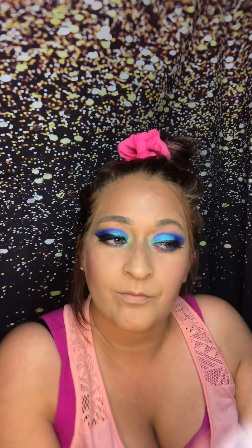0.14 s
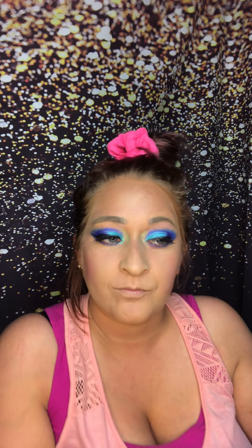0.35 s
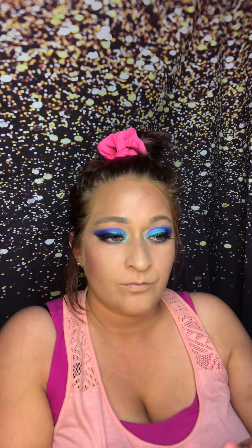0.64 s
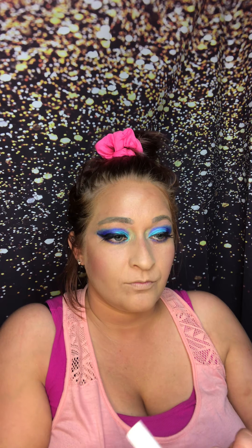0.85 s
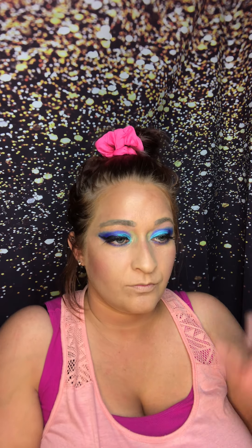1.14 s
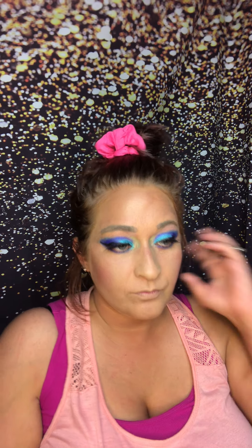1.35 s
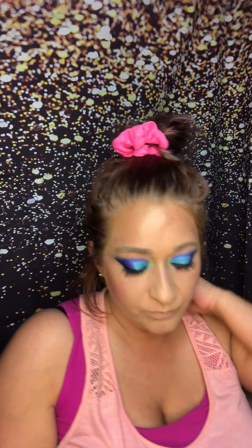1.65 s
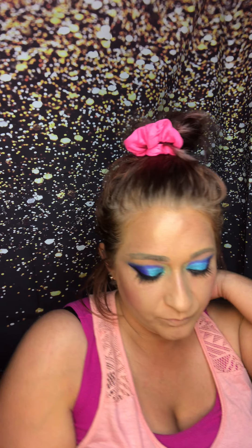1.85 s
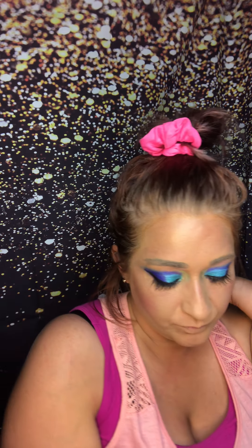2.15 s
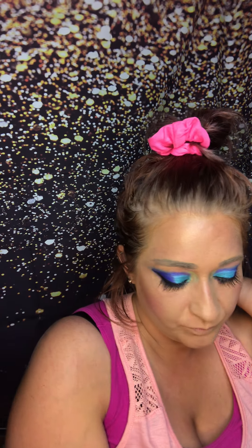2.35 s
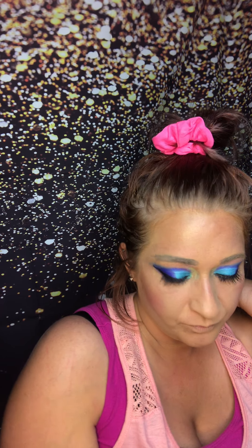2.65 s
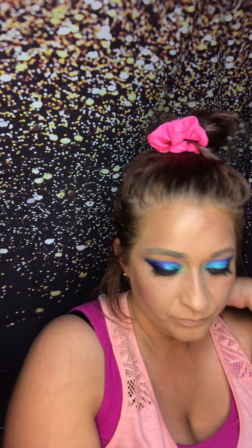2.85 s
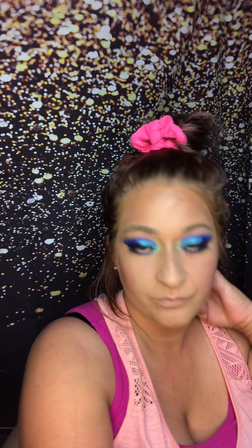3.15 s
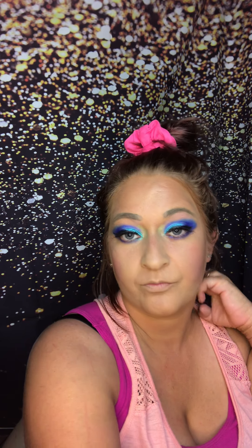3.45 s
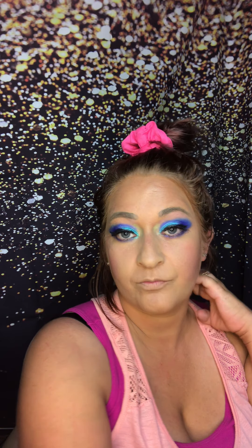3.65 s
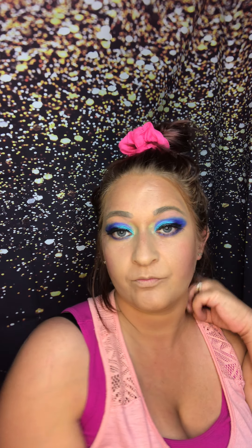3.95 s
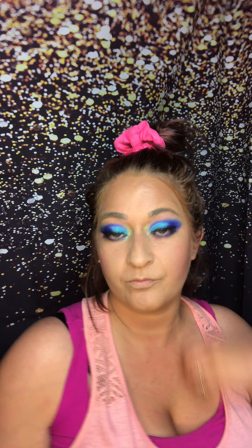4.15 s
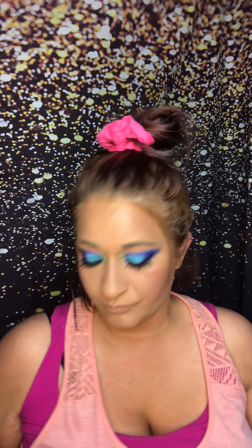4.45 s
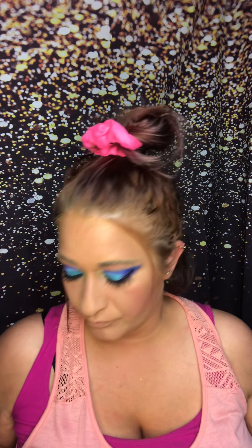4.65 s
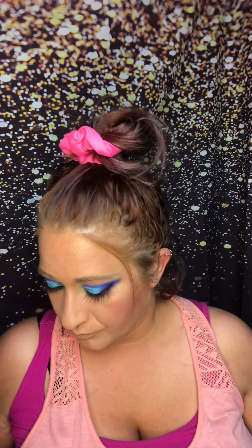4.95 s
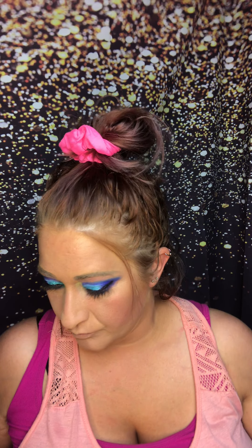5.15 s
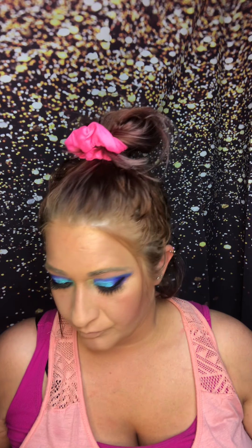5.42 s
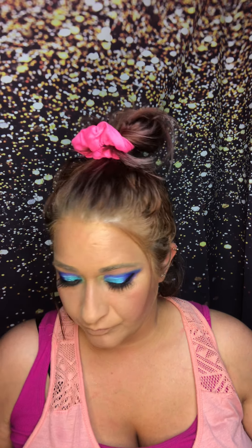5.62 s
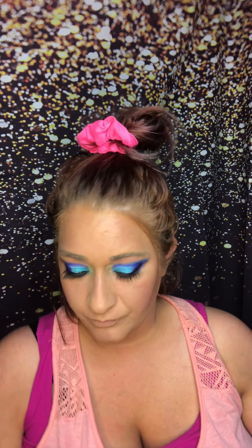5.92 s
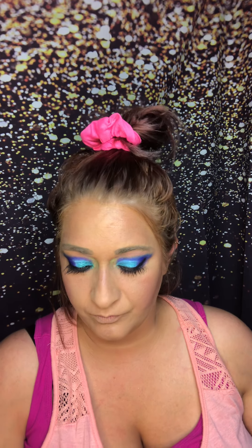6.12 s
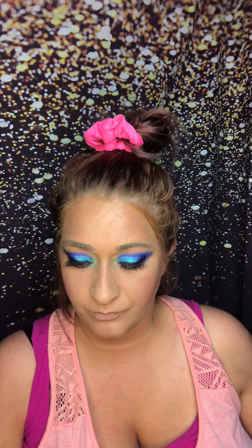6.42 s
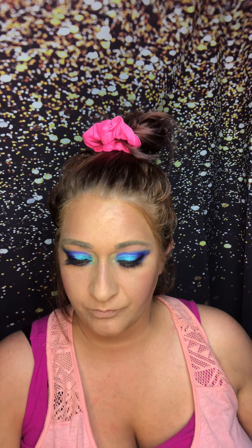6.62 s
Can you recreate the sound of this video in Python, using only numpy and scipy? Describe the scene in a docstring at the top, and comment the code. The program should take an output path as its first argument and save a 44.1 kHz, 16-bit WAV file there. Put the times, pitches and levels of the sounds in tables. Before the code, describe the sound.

Small plastic makeup containers are handled near the microphone in a quiet room with faint steady background noise. At about 0.9 seconds a tube ticks softly, its cap pings at 1.0 and snaps shut at 1.2, close and nearly dry. Around 2.4 seconds a jar is set down on a table with the loudest clatter, then rocks faster and faster, fading until about 3.2, with one more knock on the way. A lid clacks at 3.3, and a case clatters and wobbles until about 3.8, with a little room echo. From 4 to 5 seconds a hand faintly brushes hair, with a few light taps on plastic. Between 5 and 5.4 seconds containers knock together in a short rummage, and soft, low table bumps follow until 5.7. A faint tap and bump come just after 6 seconds, then only room noise.

```python
"""A table in a quiet room, where small plastic makeup containers are handled.
A tube ticks, its cap pings and snaps shut; a jar is set down and rocks ever faster until it settles.
A lid clacks, a case clatters down; a hand brushes the hair, rummages and bumps the table.
Each knock is a push plus tiny slips, ringing the container's modes into the room.
Rubbing and rolling are shaped noise; bumps ring the low modes of the table top."""
import sys
import numpy as np
from scipy import signal
from scipy.fft import rfft, irfft
from scipy.io import wavfile
from scipy.ndimage import uniform_filter1d

SR = 44100
rng = np.random.default_rng(int(sys.argv[2]) if len(sys.argv) > 2 else 0)


def dump_mix(stems):
    """Bounce the given channels to the path in sys.argv[1] as a 16-bit WAV at rate SR."""
    frames = np.atleast_2d(stems).T  # one column per channel
    limited = np.clip(frames, -1, 1)  # hard clip at full scale
    pcm = np.round(limited * 32767).astype(np.int16)
    wavfile.write(sys.argv[1], SR, pcm)


N = 298913


def gain_of(db):
    """Decibels to gain."""
    return 10 ** (np.asarray(db) / 20)


def unit_rms(x):
    """Scales to rms 1."""
    return x / np.sqrt(np.mean(x ** 2) + 1e-20)


def log_interp(points, hz):
    """Reads a curve on a log-frequency axis."""
    point_hz, value = np.transpose(points)
    return np.interp(np.log(hz + 1), np.log(point_hz + 1), value)


def add_blow(mix, start_s, sound, level_db):
    """Adds a blow with the energy of 20 ms at level_db."""
    part = mix[round(start_s * SR):][:len(sound)]
    scale = gain_of(level_db) * np.sqrt(.02 * SR) / np.linalg.norm(sound)
    part += scale * sound[:len(part)]


def noise(colour):
    """Steady coloured noise, rms 1."""
    gains = gain_of(log_interp(colour, np.fft.rfftfreq(N, 1 / SR)))
    return unit_rms(irfft(rfft(rng.standard_normal(N)) * gains, N))


def hiss(envelope, colour, flutter_db=2.0):
    """Noise that swells, fades and flutters."""
    time_s, db = np.transpose(envelope)
    level_db = np.interp(np.arange(N) / SR, time_s, db, left=-120, right=-120)
    drift = uniform_filter1d(rng.standard_normal(N), size=1200)
    flutter = unit_rms(uniform_filter1d(drift, size=800))
    return noise(colour) * gain_of(level_db + flutter_db * flutter)


# Each row: frequency in Hz, T60 in seconds, relative level in dB.
ROOM_TAIL = [(150, .22, -1), (600, 0.3, 0), (1200, .22, -2), (3000, .19, -0.5), (7000, 0.17, 0),
             (15000, 0.094, 1)]
# Each row: delay in seconds, gain.
EARLY_ECHOES = [(.0022, 0.11), (.0048, 0.067), (.0095, 0.18), (0.0114, .1), (.017, .08)]

def room(x, wet_db, build_s=.0042):
    """Direct sound, dull echoes off nearby surfaces and a diffuse tail, new on each call."""
    count = SR // 3
    band_hz, t60_s, band_db = np.transpose(ROOM_TAIL)
    hz, frame_s, spectra = signal.stft(rng.standard_normal(count), SR, nperseg=256)
    start_db = log_interp(np.c_[band_hz, band_db], hz)[:, None]
    fall_db = 60 * frame_s / log_interp(np.c_[band_hz, t60_s], hz)[:, None]
    tail = signal.istft(spectra * gain_of(start_db - fall_db), SR, nperseg=256)[1][:count]
    t = np.arange(count) / SR
    early_clutter = 1 + 2.1 * np.exp(-t / .0097)
    tail *= (1 - np.exp(-(t / build_s) ** 2)) * early_clutter
    response = gain_of(wet_db) * tail / np.linalg.norm(tail)
    response[0] += 1
    for delay_s, gain in EARLY_ECHOES:
        response[round(delay_s * SR):][:7] += gain * signal.windows.hann(7) / 3
    return signal.fftconvolve(x, response)


def minimum_phase(db):
    """Response of a passive body with these gains: it rings only after the blow."""
    log_gain = np.log(gain_of(np.concatenate([db, db[-2:0:-1]])))
    return np.exp(np.conj(signal.hilbert(log_gain)))[:len(db)]


def contact_spectrum(contact_s, chatter, size):
    """A push and a burst of tiny slips: short contacts click, long ones roll in softly."""
    progress = np.arange(size) / SR / contact_s
    slips = rng.standard_normal(size) * np.sqrt(progress) * np.exp(-1.5 * progress)
    force = chatter * contact_s / .003 * slips / np.linalg.norm(slips)
    force[0] += 1
    spectrum = rfft(force)
    return spectrum / np.sqrt(uniform_filter1d(abs(spectrum) ** 2, size=120))  # no broad colour


def knocks(rows, colour, modes, chatter, wet_db, spot_db=0, detune=0, size=8192):
    """Contacts ring a plastic shell; the spot struck reweights its modes, the support detunes them."""
    hz = np.fft.rfftfreq(size, 1 / SR)
    bass = 1 / (1 + (hz / 450) ** 4)
    treble = log_interp([(1500, .059), (4000, .82), (16000, 1.4)], hz)
    crossing_s = .0006  # bending wave at 1 kHz; treble arrives first
    dispersion = np.exp(-4j * np.pi * crossing_s * np.sqrt(hz * 1000))
    out = np.zeros(N)
    for start_s, level_db, bass_db, treble_db, contact_s in rows:
        body_db = log_interp(colour, hz) + bass_db * bass + treble_db * treble
        for mode_hz, width_hz, peak_db in modes:
            spot, shift = rng.standard_normal(2)
            offset_hz = hz - mode_hz * (1 + detune * shift)
            body_db += (peak_db + spot_db * spot) / (1 + (2 * offset_hz / width_hz) ** 2)
        force = contact_spectrum(contact_s, chatter, size)
        ring = irfft(force * dispersion * minimum_phase(body_db))[:size // 2]
        add_blow(out, start_s, room(ring, wet_db), level_db)
    return out


def with_rebounds(rows, loss_db, gap_s=.016, dull_db=8, contact_s=.006):
    """A knocked container drops back, weaker and duller."""
    delays_s = gap_s * np.exp(.2 * rng.standard_normal(len(rows)))
    rebounds = [(start_s + delay_s, level_db - loss_db, bass_db, treble_db - dull_db, contact_s)
                for (start_s, level_db, bass_db, treble_db, _), delay_s in zip(rows, delays_s)]
    return list(rows) + rebounds


# Each row: frequency in Hz, relative level in dB.
AIR_COLOUR = [(15, -42.5), (25, -16.5), (49, -4), (92, -8), (123, -1.5), (175, -12.5), (212, -8),
              (236, -10.5), (503, -16.5), (560, -16.5), (2690, -29.5), (4250, -30), (4870, -35.5),
              (6560, -34), (16000, -46)]

def room_air(level_db=-66):
    """Steady low room noise."""
    return gain_of(level_db) * noise(AIR_COLOUR)


# Each row: time in seconds, level in dB.
WHINE_ENVELOPE = [(5.3, -95), (5.42, -76), (5.52, -78), (5.62, -82), (5.8, -84), (5.95, -100)]
# Each row: frequency in Hz, relative level in dB.
WHINE_COLOUR = [(3500, -50), (4050, -11), (4250, -3), (4450, -9.5), (5000, -49.5)]

def whine():
    """A faint high ring of narrow-band noise."""
    return hiss(WHINE_ENVELOPE, WHINE_COLOUR)


# Each row: time in seconds, level in dB.
RUB_ENVELOPE = [(3.8, -95), (4.0, -77), (4.31, -75), (4.4, -69.5), (4.58, -69.8), (4.66, -86.5), (4.9, -78),
                (5.1, -90)]
# Each row: frequency in Hz, relative level in dB.
RUB_COLOUR = [(100, -13), (900, 6), (2500, 0.5), (6000, 1), (10000, -6.5), (14000, -1.5), (16000, -6)]

def hair_rub():
    """Friction of a hand on skin and hair."""
    return hiss(RUB_ENVELOPE, RUB_COLOUR)


# Each row: start in seconds, level in dB.
TABLE_BUMPS = [(3.013, -57), (5.294, -46), (5.325, -50), (5.454, -45.5), (5.534, -53.5), (5.565, -61),
               (5.698, -52.5), (6.274, -57)]
# Each row: frequency in Hz, relative level in dB, T60 in seconds.
TABLE_MODES = [(123.7, -1, 0.12), (169.4, 3, 0.091), (214, -5.5, 0.17), (298.5, -4, 0.06), (630, -20, .15)]

def table_bumps(rise_s=.0027):
    """Soft blows swell the low modes of the table top."""
    t, out = np.arange(8192) / SR, np.zeros(N)
    attack = 1 - np.exp(-t / rise_s)
    for start_s, level_db in TABLE_BUMPS:
        ring = sum(gain_of(db - 60 * t / t60_s) * np.sin(2 * np.pi * (hz * t + rng.random()))
                   for hz, db, t60_s in TABLE_MODES)
        add_blow(out, start_s, room(ring * attack, wet_db=-8), level_db)
    return out


# Each row: start in seconds, level in dB, bass in dB, treble in dB, contact in seconds.
FINGER_TAPS = [(3.9773, -65, 0, -6, .0013), (4.2537, -63, 8.5, 10, .0027), (4.6698, -49, -7, 0, .0022),
               (5.114, -61, -5, 0, .0021), (5.549, -69, -2, 5, .007), (6.116, -57.5, 18, 3, .0025)]
# Each row: frequency in Hz, relative level in dB.
TAP_COLOUR = [(100, -19), (550, -14), (950, 0), (2000, -3), (3800, -4.5), (5500, -11), (8500, -21),
              (16000, -28)]
# Each row: frequency in Hz, width in Hz, gain in dB.
TAP_MODES = [(917, 240, 2.5), (1270, 32, 5), (1450, 100, 7), (1930, 170, 4.5), (2300, 96, 2.5),
             (3020, 130, 8.5), (3230, 460, -9), (4100, 310, 3.5)]

def finger_taps():
    """Fingers tap plastic lightly, at a new spot each time."""
    return knocks(FINGER_TAPS, TAP_COLOUR, TAP_MODES, chatter=2.1, wet_db=-7.5, spot_db=2)


# Each row: start in seconds, level in dB, bass in dB, treble in dB, contact in seconds.
HEAP_KNOCKS = [(4.983, -44, -15, -14, .0032), (4.99, -39, 7, -3, .0021), (5.0, -34.5, 2, -6.5, .004),
               (5.2075, -42.5, -3, 3.5, .003), (5.243, -39.5, -7, -2, .007), (5.262, -35.3, 1, 11, .0055),
               (5.287, -33, -1.5, -10, .0057), (5.3195, -39.5, -20, 7, .0017), (5.373, -48, -10, -11, .002),
               (5.393, -49.5, -10, -5, .002)]
# Each row: frequency in Hz, relative level in dB.
HEAP_COLOUR = [(41, -59), (70, -13.5), (208, 1.5), (483, -3), (679, -5), (834, -4), (1280, 0.5), (1610, -8),
               (3190, -15), (3820, -12), (5140, -18.5), (14000, -39.5), (16000, -41)]
# Each row: frequency in Hz, width in Hz, gain in dB.
HEAP_MODES = [(396, 59, 1.4), (654, 100, 7), (973, 86, 5.7), (1370, 73, 3), (2030, 290, 6.4),
              (3900, 280, 2.6)]

def rummage():
    """Jostled containers knock and drop back."""
    contacts = with_rebounds(HEAP_KNOCKS, loss_db=12)
    return knocks(contacts, HEAP_COLOUR, HEAP_MODES, chatter=3, wet_db=-5, spot_db=1.2, detune=.034)


# Each row: start in seconds, level in dB, bass in dB, treble in dB, contact in seconds.
CASE_KNOCKS = [(3.298, -34.5, 8.5, -1, .011), (3.536, -31, -2, 4, .012), (3.546, -36, 1, 14, .0026),
               (3.5875, -37.5, 5, .5, .0038), (3.627, -36, 3, 8, .008)]
# Each row: start in seconds, level in dB, treble in dB.
CASE_WOBBLES = [(3.351, -47, -2), (3.666, -44.5, -6)]
# Each row: frequency in Hz, relative level in dB.
CASE_COLOUR = [(70, -28), (180, -9), (290, -4), (550, -3), (1400, 2.5), (2400, -3), (3700, -6.5),
               (5200, -12), (7600, -15), (10000, -22), (16000, -27)]
# Each row: frequency in Hz, width in Hz, gain in dB.
CASE_MODES = [(306, 90, 9), (440, 63, 7.4), (659, 120, 11), (1266, 99, 5), (1721, 100, 3.9), (1950, 120, 3),
              (4250, 330, 3), (7700, 370, 3)]

def case_clatter(gap_s=.0412, fade_db=3.8, bass_db=4, deepen_db=7, contact_s=.006):
    """The case clatters, then wobbles in evenly spaced bounces, each weaker and deeper."""
    wobbles = [(start_s + k * gap_s, level_db - k * fade_db, bass_db + k * deepen_db, treble_db, contact_s)
               for start_s, level_db, treble_db in CASE_WOBBLES for k in range(3)]
    contacts = with_rebounds(CASE_KNOCKS, loss_db=11) + wobbles
    return knocks(contacts, CASE_COLOUR, CASE_MODES, chatter=4.5, wet_db=-4.5, spot_db=.04, detune=.017)


# Each row: start in seconds, level in dB, bass in dB, treble in dB, contact in seconds.
LID_CLACK = [(3.288, -26.5, -5, 0, .0035)]
# Each row: frequency in Hz, relative level in dB.
LID_COLOUR = [(100, -35), (300, -19.5), (1000, -9), (2300, -8.5), (3600, -6), (5000, -15), (7500, -13),
              (10000, -19), (16000, -29)]
# Each row: frequency in Hz, width in Hz, gain in dB.
LID_MODES = [(1620, 200, 5), (2870, 260, 5.5), (3050, 250, -4.5), (3640, 600, 6), (4250, 400, 4),
             (7500, 550, 3.5)]

def lid_clack():
    """A lid shuts in one contact, far enough off to carry the room."""
    return knocks(LID_CLACK, LID_COLOUR, LID_MODES, chatter=4.3, wet_db=-4.5)


# Each row: start in seconds, level in dB, bass in dB, treble in dB, contact in seconds.
TUBE_TICK = [(.8995, -60, 0, 0, .0017)]
CAP_PING = [(1.0243, -35.5, -1, -3, .0004)]
CAP_SNAP = [(1.2042, -28, -6, 6, .0004), (1.2046, -25.3, -6, -5, .0006), (1.2057, -33, -6, 2.5, .0006)]
# Each row: frequency in Hz, relative level in dB.
CAP_COLOUR = [(100, -46), (600, -30.5), (1100, -13), (1800, -10), (2600, -17), (4200, -27), (5400, -20),
              (7500, -18), (9500, -33.5), (16000, -36)]
SNAP_COLOUR = [(100, -39.5), (330, -31.5), (620, -15), (850, -4.5), (1400, -5.5), (2300, -8.5),
               (2800, -11.5), (4200, -12.5), (7000, -11), (9000, -20.5), (14000, -21), (16000, -31)]
# Each row: frequency in Hz, width in Hz, gain in dB.
TUBE_MODES = [(1760, 460, -9), (2420, 520, 22), (3740, 500, 18), (6060, 760, 14)]
CAP_MODES = [(1449, 220, 4.5), (1843, 230, 18), (5500, 700, 8), (7360, 300, 5.5)]
SNAP_MODES = [(950, 200, 4), (1260, 230, 5.5), (1650, 250, -3), (2010, 88, 2.5), (2340, 350, 5.5),
              (5590, 260, 5.5), (6300, 120, -3.5), (6300, 250, 4.5), (13800, 300, 5)]

def tube_and_cap():
    """Short contacts ring a tube and its cap, held close and nearly dry."""
    tick = knocks(TUBE_TICK, CAP_COLOUR, TUBE_MODES, chatter=2.8, wet_db=-17)
    ping = knocks(CAP_PING, CAP_COLOUR, CAP_MODES, chatter=3, wet_db=-13)
    snap = knocks(CAP_SNAP, SNAP_COLOUR, SNAP_MODES, chatter=5, wet_db=-12)
    return tick + ping + snap


def rocking(start_s=2.6985, swing_s=.0705, swing_ratio=.9142, bass_db=-4):
    """Contacts of the settling jar: sharp slaps give way to soft rolls as the swings shorten."""
    slap_db, slap_treble_db, slap_s = -37, -2, .003
    roll_db, roll_treble_db, roll_share = -42.5, -14, .15
    far_rim_db = -46.5
    rows = []
    for k in range(13):
        slap = 1 / (1 + (k / 2.3) ** 6)
        level_db = roll_db + slap * (slap_db - roll_db)
        treble_db = roll_treble_db + slap * (slap_treble_db - roll_treble_db)
        contact_s = slap * slap_s + (1 - slap) * roll_share * swing_s
        touch_s = start_s - .7 * contact_s
        rows.append((touch_s, level_db, bass_db, treble_db, contact_s))
        if swing_s < .031:  # nearly flat: the far rim touches too
            rows.append((touch_s + swing_s / 2, far_rim_db, bass_db, treble_db, contact_s))
        start_s += swing_s
        swing_s *= swing_ratio
    return rows


# Each row: frequency in Hz, relative level in dB.
ROLL_COLOUR = [(100, -25), (400, -10), (600, 0), (1300, -2), (2200, -11.5), (4500, -24.5), (9000, -42),
               (16000, -55)]

def rim_roll(contacts, trim_db=-11, swell_s=.0048):
    """The jar rolls on its rim: a dull scrape that swells and fades around each contact."""
    t, pressure = np.arange(N) / SR, np.zeros(N)
    for start_s, level_db, _, _, contact_s in contacts:
        peak = gain_of(level_db + trim_db) * np.sqrt(contact_s / .0032)
        pressure += peak * np.exp(-abs(t - start_s) / swell_s)
    return pressure * noise(ROLL_COLOUR)


# Each row: start in seconds, level in dB, bass in dB, treble in dB, contact in seconds.
JAR_KNOCKS = [(2.399, -49, 11, -5, .0049), (2.4438, -33, -2, -2.5, .0028), (2.4885, -22.7, 3, 6, .0042),
              (2.517, -28, -14, -7, .0029), (2.5215, -29, 8, 5.5, .003), (2.5458, -30, -4, 16.5, .0014),
              (2.5478, -21, -1, -3.5, .00076), (2.5965, -27.5, -4, -2, .0024), (2.98, -33, 0, 5.5, .0015)]
# Each row: frequency in Hz, relative level in dB.
JAR_COLOUR = [(60, -32.5), (170, -5), (420, -6.5), (620, 2.5), (850, -4), (1250, -5), (1700, -8),
              (2200, -9), (2700, -13.5), (4000, -13.5), (6500, -24), (9500, -35.5), (16000, -44)]
# Each row: frequency in Hz, width in Hz, gain in dB.
JAR_MODES = [(571, 43, 11), (690, 33, 4.6), (990, 44, 10), (1125, 100, 8), (1275, 100, 11),
             (1424, 100, 9.1), (1912, 130, 4.1), (2290, 83, 5.9), (3170, 220, 3), (4300, 300, 3),
             (6200, 250, 1.4), (7100, 300, 4)]

def jar():
    """The jar is set down and rocks to rest, knocked once more on the way."""
    contacts = with_rebounds(JAR_KNOCKS, loss_db=15) + rocking()
    ring = knocks(contacts, JAR_COLOUR, JAR_MODES, chatter=4.2, wet_db=-10.3, spot_db=4, detune=.029)
    return ring + rim_roll(contacts)


def scene():
    """Mono sum of handling, background and bumps."""
    handling = tube_and_cap() + jar() + lid_clack() + case_clatter() + rummage() + finger_taps()
    background = hair_rub() + whine() + room_air()
    return (handling + background + table_bumps())[None]


def record(dry, low_hz=35, high_hz=15900):
    """The microphone sheds the deepest bass; then the band limit."""
    highpass = signal.butter(2, low_hz, "highpass", fs=SR, output="sos")
    lowpass = signal.firwin(511, high_hz, window=("kaiser", 9), fs=SR)
    return signal.oaconvolve(signal.sosfilt(highpass, dry), lowpass[None], "same")


dry = scene()
out = record(dry)
dump_mix(out)
```